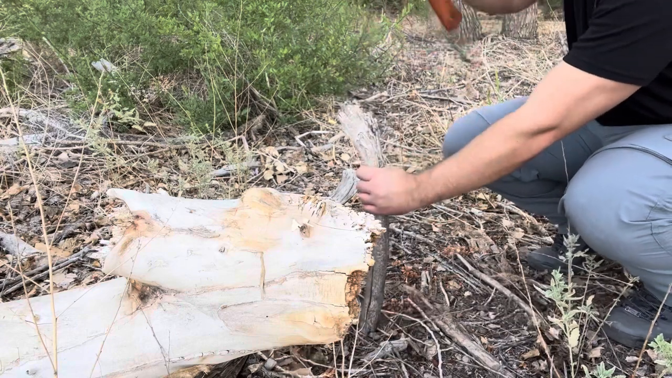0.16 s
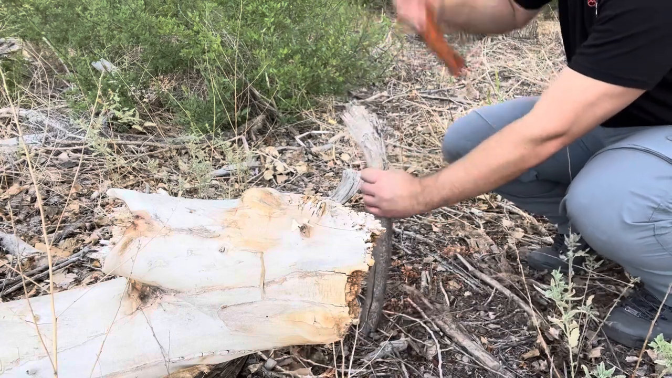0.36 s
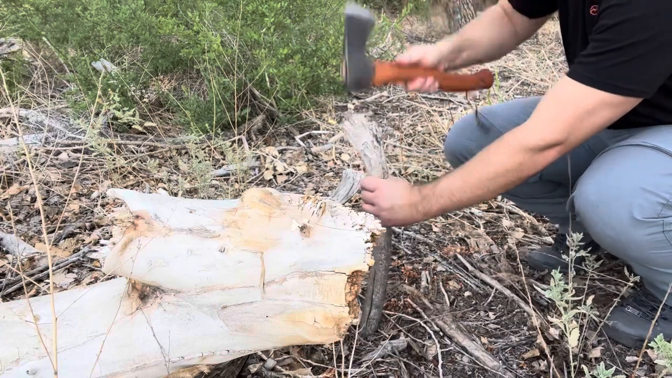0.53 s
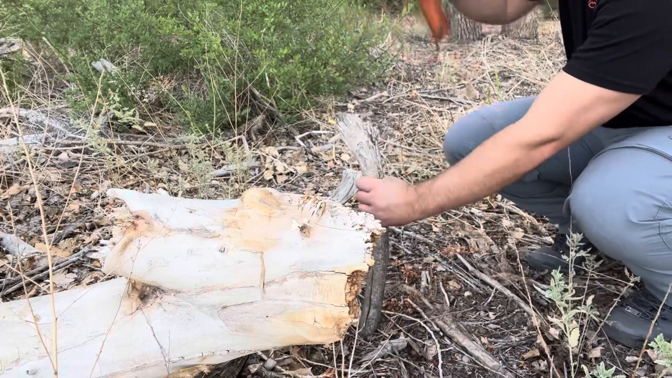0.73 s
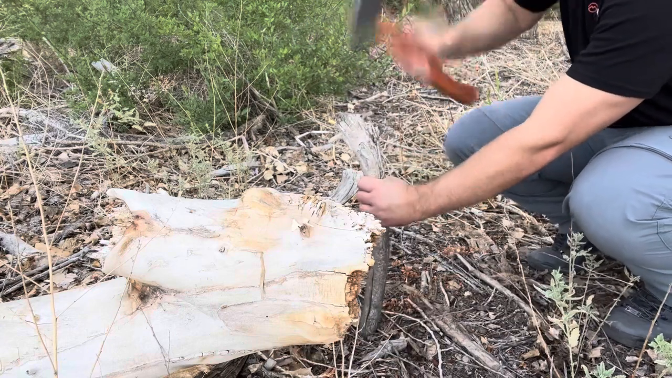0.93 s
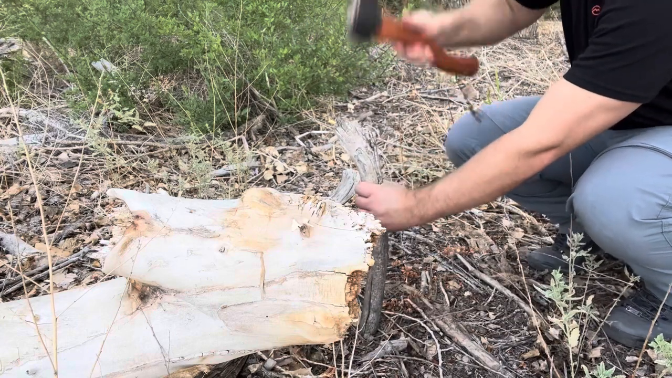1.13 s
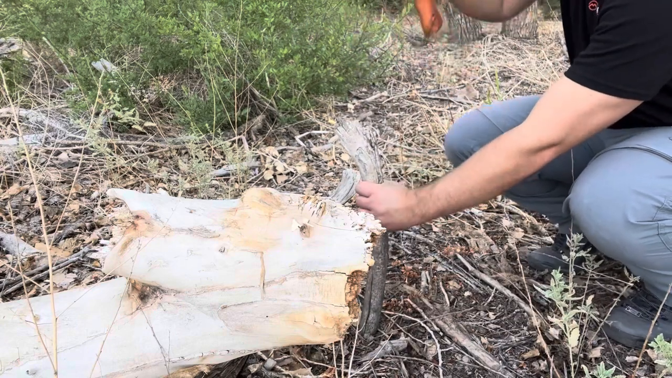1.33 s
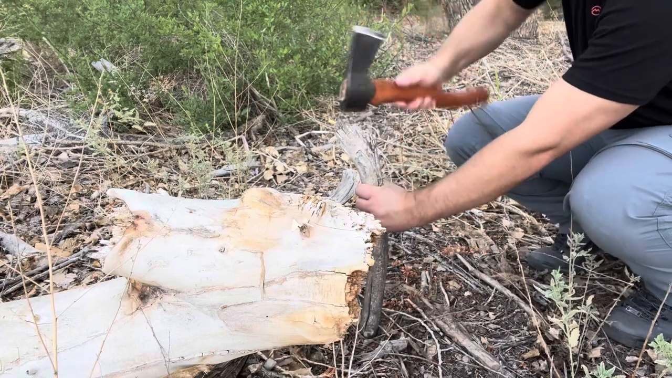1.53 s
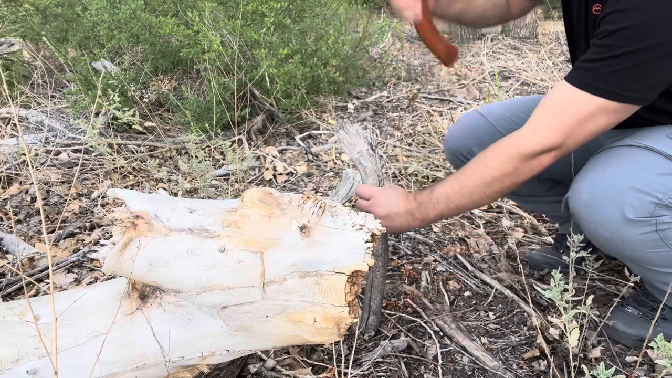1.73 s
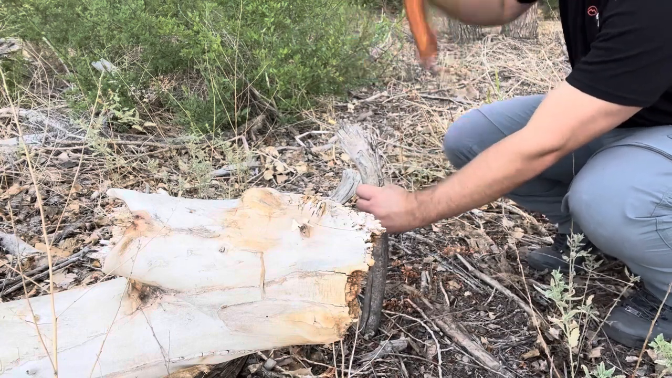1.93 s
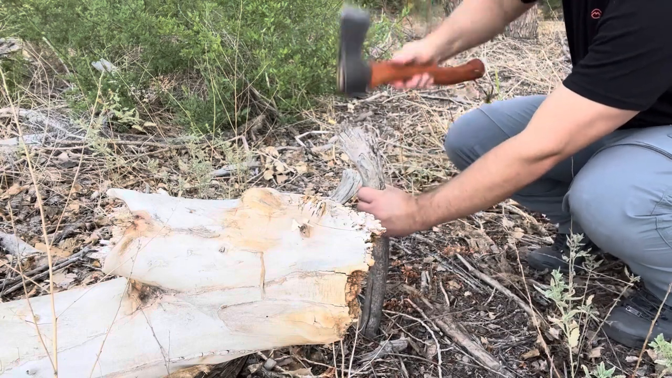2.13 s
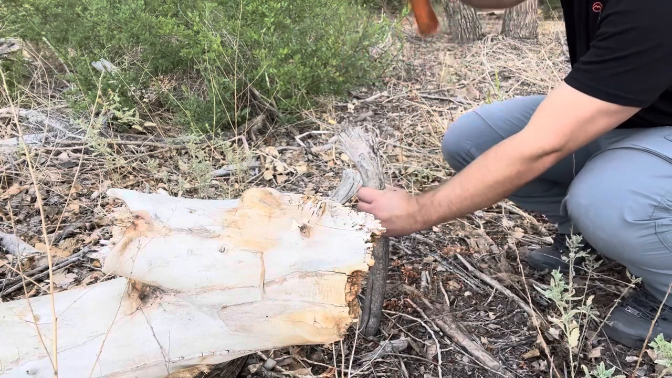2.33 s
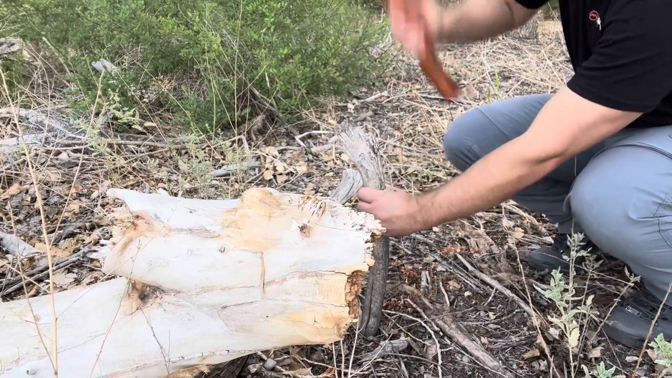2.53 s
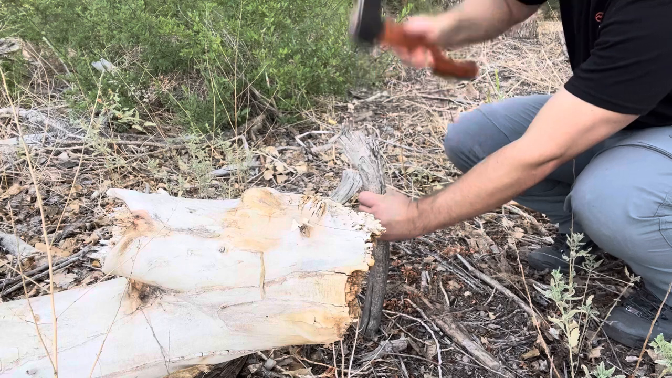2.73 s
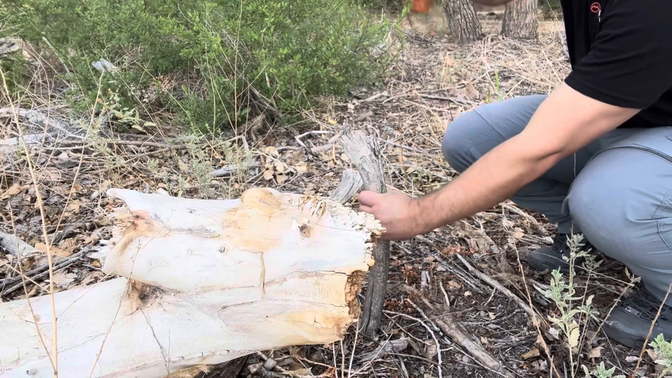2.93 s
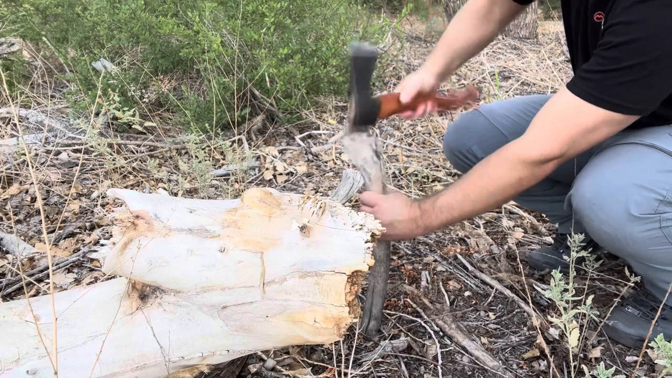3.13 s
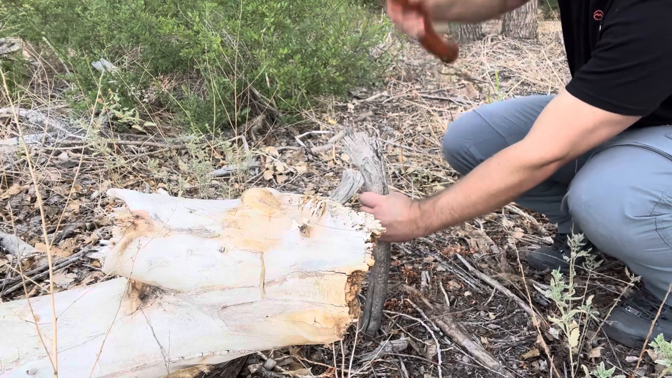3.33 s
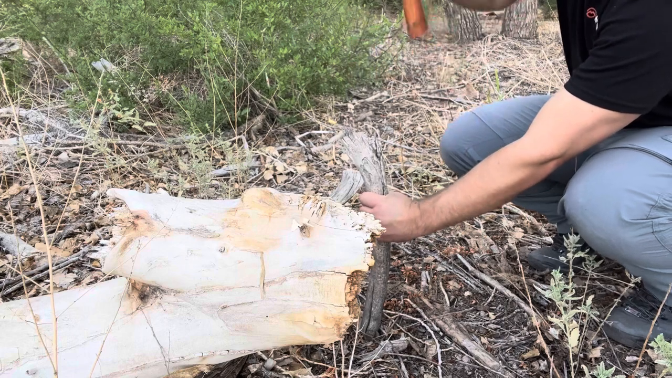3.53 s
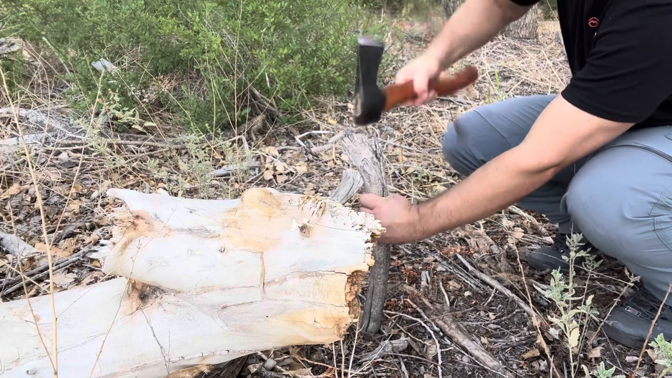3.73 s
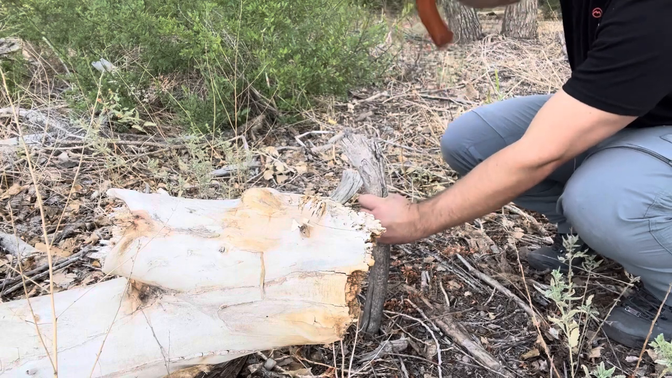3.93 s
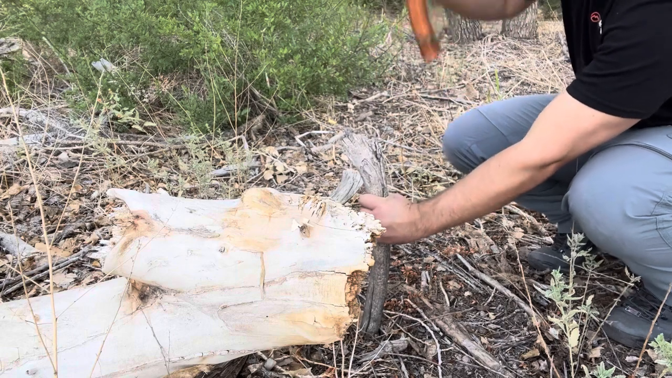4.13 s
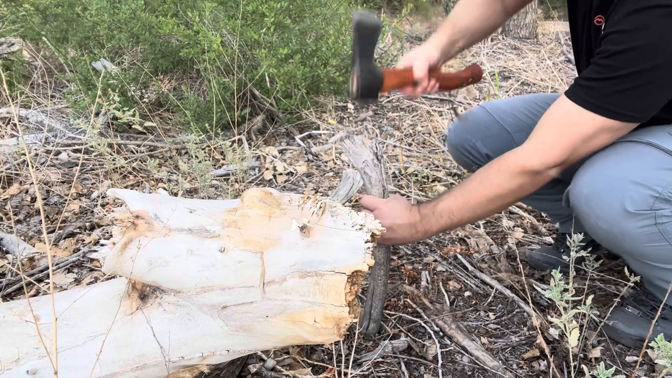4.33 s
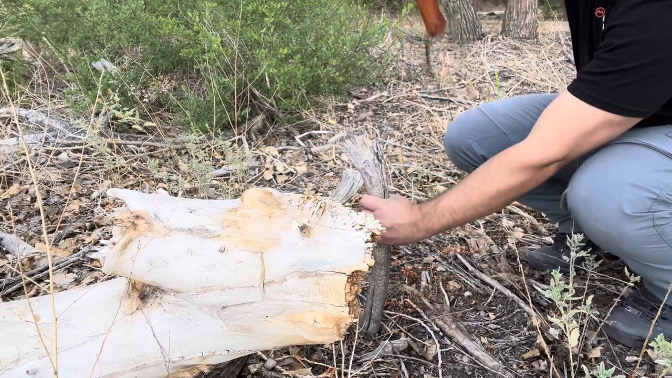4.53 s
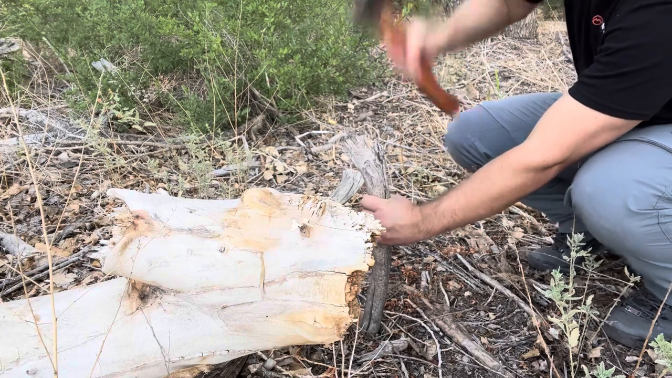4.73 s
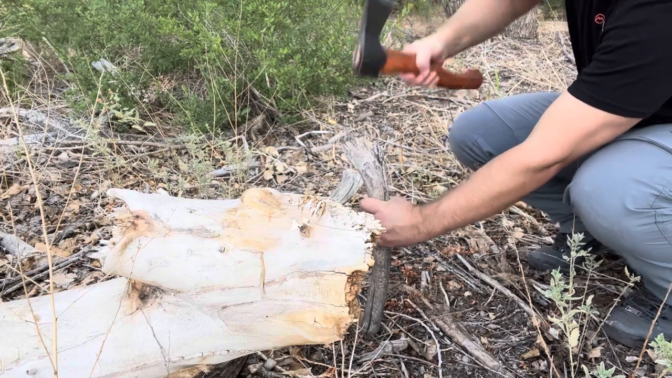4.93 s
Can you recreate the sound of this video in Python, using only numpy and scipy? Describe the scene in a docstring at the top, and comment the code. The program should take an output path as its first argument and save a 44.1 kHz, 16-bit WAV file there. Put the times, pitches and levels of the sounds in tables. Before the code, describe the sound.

A steel hatchet head knocks a dry wooden stake into the ground, nine sharp even blows echoing softly off brush outdoors.

```python
"""Open ground beside a log: a hatchet head drives a dry wooden stake in with nine even knocks, the seventh glancing.
Each blow is decaying noise for the cracking end grain, damped modes for stake and soil, and a short steel ring;
banded noise returns it from the litter, the log and the brush.
Dry litter crackles and snaps around each swing; a far bird calls in narrow-band notes.
Behind lie a thin hum that steps up once and a steady rumble with faint hiss."""
import sys
import numpy as np
from scipy import signal
from scipy.fft import rfft, irfft, next_fast_len
from scipy.io import wavfile
from scipy.ndimage import uniform_filter1d

SR = 44100
rng = np.random.default_rng(int(sys.argv[2]) if len(sys.argv) > 2 else 0)


def log_audio(samples):
    """Write samples as a 16-bit WAV file to the path given in sys.argv[1]."""
    # one column per channel
    frames = np.atleast_2d(samples).T
    # limit to full scale, then quantise
    limited = np.clip(frames, -1, 1)
    pcm = np.round(limited * 32767).astype(np.int16)
    wavfile.write(sys.argv[1], SR, pcm)


N = 223669

# hatchet blows: start_s, force_db, glance (0 square to 1 skidding), middle_modes_db, crack_tilt_db_per_octave,
# steel_ring_db, body_pitch_factor, high_modes_pitch_factor, swing_rustle_db
BLOWS = [(0.419, -2, .04, 2.5, 6, -56, 0.94, 0.91, -62), (0.9546, -3, .05, 2, 2, -21, 1, 1.003, -92),
         (1.4791, -2.5, 0.2, 2, -0.5, -37, .91, .9, -78.5),
         (2.0143, -2, 0.028, -2, 5, -32.5, 1.09, 1.05, -69), (2.572, 2, 0.5, 0, 2.5, -29, 1.04, 1.012, -75),
         (3.119, -1, .3, -4, 2, -60, 0.93, 0.84, -69.5),
         (3.6484, 0.5, 1, 1.5, 7.5, -49, 1.14, 1.005, -62.5),
         (4.2176, -2, 0.36, 2, 4, -44.5, .81, 0.94, -69), (4.7601, 0, 0.56, 2.5, 3, -46, 0.93, 1.05, -63)]
# hatchet head modes: pitch_hz, level_db, t60_s
STEEL = [(3768, 0, .075), (3850, -7, .06), (4077, -11, .06), (8549, -10, .09), (9092, -12, .075),
         (11050, -5, .035)]
SWING_LEAD_S, SWING_WIDTH_S = 0.14, 0.075  # rustle centre before each blow, Gaussian sigma


def amp(db):
    """Decibels to gain."""
    return 10 ** (np.asarray(db) / 20)


def evened(x):
    """Scales to rms 1."""
    return x / np.sqrt(np.mean(x ** 2) + 1e-20)


def decay(t, t60_s):
    """Exponential decay, down 60 dB after t60_s."""
    return np.exp(-np.log(1000) * t / t60_s)


def read(points, hz, axis=1):
    """One column of a table, interpolated over log frequency."""
    table = np.transpose(points)
    return np.interp(np.log(hz + 1), np.log(table[0] + 1), table[axis])


def add(mix, start_s, sound):
    """Mixes a stereo sound in at start_s, cut at the end of the mix."""
    part = mix[:, max(round(start_s * SR), 0):][:, :sound.shape[1]]
    part += sound[:, :part.shape[1]]


def diffuse(size):
    """Flat random-phase spectra of noise from all around, partly alike left and right."""
    # likeness of the two channels: freq_hz, likeness (-1 to 1)
    likeness = [(60, 0.98), (130, 0.91), (250, 0.82), (500, -0.12), (950, -0.35), (2000, 0.17),
                (15000, -0.18)]
    hz = np.fft.rfftfreq(size, 1 / SR)
    a, b = np.exp(2j * np.pi * rng.random((2, len(hz))))
    same = np.clip(read(likeness, hz), -1, 1)
    return hz, np.array([a, same * a + np.sqrt(1 - same ** 2) * b])


def burst(bands, size, tilt_db=0, hold_s=0):
    """Stereo noise puff; each band lingers for about hold_s, then decays at its own rate."""
    hz, spectra = diffuse(size)
    t = np.hypot(np.arange(size) / SR, hold_s) - hold_s
    out = np.zeros((2, size))
    log_centres = np.log([row[0] for row in bands])
    for share, (centre_hz, level_db, t60_s) in zip(np.eye(len(bands)), bands):
        weight = np.interp(np.log(hz + 1), log_centres, share)  # triangular, overlapping its neighbours
        band = evened(irfft(spectra * weight, size))
        gain = amp(level_db + tilt_db * np.log2(centre_hz / 4000))
        out += band * gain * decay(t, t60_s)
    return out


def from_stake(x, turn=1):
    """Places a mono sound at the stake by phase and level; a smaller turn shrinks the phase offset."""
    # stereo offsets: freq_hz, right_lead_rad, left_minus_right_db
    offsets = [(100, .2, -.7), (280, .7, -1.5), (600, .75, -5), (1100, .7, -.5), (2000, 1.4, -1),
               (3200, 2.4, -3), (5200, 3.5, -5), (6800, 3.9, -1.5), (9000, 2.2, -.5), (12000, 0, 0),
               (15000, -2.9, 0)]
    size = next_fast_len(len(x) + 512)
    hz = np.fft.rfftfreq(size, 1 / SR)
    half = amp(read(offsets, hz, axis=2) / 2) * np.exp(-0.5j * turn * read(offsets, hz))
    return irfft(rfft(x, size) * np.array([half, 1 / half]), size)[:, :len(x)]


def mode(t, hz, swell_s, steep=1):
    """A heavily damped vibration that peaks at swell_s and then dies."""
    u = np.maximum(t, 0) / swell_s
    return (u * np.exp(1 - u)) ** steep * np.sin(2 * np.pi * hz * t)


def blows(spread_db=-13, near_db=-33):
    """Crack, stake, soil and steel of every blow, then the scatter of the surroundings."""
    # square blow at force 0 dB: body_db, middle_modes_db, top_modes_db, crack_db, thud_db
    square_db = np.array((-12.5, -12, -17, -13.5, -11))
    # change at full glance, same columns: a skidding head barely drives the stake
    glance_change_db = np.array((-22, -9.5, 2, -12, -6.5))
    loose_db, seat_s, firm_db_per_s = -15.5, 0.33, 0.97  # thud weak until seated, then grows with depth
    echo_base_db, clack_base_db = -47, -37.5
    glance_echo_db = 1  # a skidding blow throws more sound into the brush
    steel_turn = 0.45  # the head rings above the stake, nearer the centre
    rock_lag_s, rock_db, rock_hz, rock_t60_s = 0.053, -45, 1050, 0.017  # stake rocks back with a dull tap

    out = np.zeros((2, N))
    t = np.arange(SR) / SR
    first_s = BLOWS[0][0]
    for start_s, force_db, glance, spot_db, tilt_db, ring_db, body_pitch, high_pitch, _ in BLOWS:
        levels_db = force_db + square_db + glance ** 2 * glance_change_db
        body_db, middle_db, top_db, crack_db, thud_db = levels_db
        thud_db -= force_db  # the thud does not follow the force
        thud_db += loose_db * np.exp(-(start_s - first_s) / seat_s) + firm_db_per_s * start_s
        echo_db = echo_base_db + force_db + glance_echo_db * glance
        clack_db = clack_base_db + force_db + 20 * np.log10(abs(glance) + 1e-6)

        wood = stake(t, [body_db, middle_db + spot_db, top_db], [body_pitch, high_pitch])
        soil = amp(thud_db) * thud(t)
        add(out, start_s, from_stake(wood + soil))
        add(out, start_s, from_stake(amp(ring_db) * steel(t), steel_turn))
        centre, width = amp(crack_db) * crack(tilt_db)
        add(out, start_s, from_stake(centre) + amp(spread_db) * np.array([width, -width]))
        add(out, start_s, amp(near_db + crack_db / 2) * near_scatter())
        add(out, start_s + rock_lag_s, snap(rock_db + force_db, rock_hz, rock_t60_s))
        add(out, start_s, brush(t, echo_db, clack_db))
        add(out, start_s, amp(ring_db) * ring_echo(t))
    return out


def stake(t, levels_db, pitches, lag_cycles=0.81, scatter=0.029, spot_scatter_db=3):
    """Bending waves run slower at low pitch, so low modes arrive later; each blow lands on another spot."""
    # bending modes at pitch factor 1: pitch_hz, level_db, swell_s
    bending_modes = [(275, -9, .0033), (505, 1, .0018), (930, 0.5, .0015), (1370, -1, .0012),
                     (1600, -3, .0012), (1860, -3, .0012), (2480, -0.5, .001), (3050, -3, .0011)]
    out = np.zeros(len(t))
    draws = rng.standard_normal((len(bending_modes), 2))
    for (hz, db, swell_s), (detune, spot) in zip(bending_modes, draws):
        high = np.clip(np.log2(hz / 550), 0, 1)  # only the higher modes vary at random
        group_db = np.interp(hz, [600, 1400, 1900, 2400], np.repeat(levels_db, [1, 2, 1]))
        level_db = db + group_db + spot_scatter_db * high * spot
        pitch = np.interp(hz, [600, 900], pitches) + scatter * high * detune
        out += amp(level_db) * mode(t - lag_cycles / hz, hz * pitch, swell_s)
    return out


def crack(tilt_db, crush_s=0.0005, bounce_s=0.0022, bounce_db=-7):
    """End-grain fibres give way in a few uneven snaps; the ground mirrors them a moment later."""
    # crushed end grain before tilt: centre_hz, level_db, t60_s
    grain_bands = [(740, -12.5, .016), (1620, -6, 0.057), (2700, -5.5, 0.04), (4800, -5, 0.015),
                   (5730, 4, 0.012), (7910, 1.5, 0.0061), (9550, -2.5, 0.012), (11850, -8.5, 0.011),
                   (16700, -14.5, .009)]
    t = np.arange(2048) / SR
    snaps = amp(3.5 * evened(uniform_filter1d(rng.standard_normal(len(t)), 14)))
    smooth = burst(grain_bands, size=len(t), tilt_db=tilt_db) * (1 - np.exp(-t / crush_s))
    uneven = smooth * snaps
    direct = uneven * np.std(smooth) / np.std(uneven)
    return direct + amp(bounce_db) * np.roll(direct, round(bounce_s * SR), axis=1)


def thud(t, rebound_s=0.0175, rebound_db=-12, steep=3.7, lag_cycles=0.86):
    """The soil takes up the blow a moment later, and once more as the stake springs back."""
    # soil and the log resting on it: pitch_hz, level_db, swell_s
    ground_modes = [(70.5, -13, 0.017), (119.2, -5, 0.011), (191, -13, 0.0094)]

    def jolt(u):
        """Sums the ground modes, low ones later."""
        return sum(amp(db) * mode(u - lag_cycles / hz, hz, swell_s, steep) for hz, db, swell_s in ground_modes)

    return jolt(t) + amp(rebound_db) * jolt(t - rebound_s)


def steel(t):
    """The hatchet head rings briefly as decaying sine modes."""
    return sum(amp(db) * decay(t, t60_s) * np.sin(2 * np.pi * hz * t) for hz, db, t60_s in STEEL)


def near_scatter():
    """Litter and log close by scatter the blow as short banded noise."""
    # close scatter: centre_hz, level_db, t60_s
    near_bands = [(300, 15, 0.13), (870, 6.5, 0.081), (2000, 12.5, 0.075), (3640, 15, 0.083),
                  (7640, 9, 0.038), (11000, 0, 0.16), (15600, -28, .08)]
    return burst(near_bands, size=8192)


def far_note(t, centre_hz, width_hz, rise_s, t60_s):
    """A narrow band of sound smeared by many paths through the trees."""
    hz, spectra = diffuse(size=len(t))
    resonance = 1 / (1 + ((hz - centre_hz) / width_hz) ** 2)
    note = evened(irfft(spectra * resonance, len(t)))
    return note * (1 - np.exp(-t / rise_s)) * decay(t, t60_s)


def brush(t, echo_db, clack_db, clump_db=1.2):
    """Bushes and trunks at many distances return the blow in clumps, the stake's clack standing out."""
    # echo from bushes and trees: centre_hz, level_db, t60_s
    far_bands = [(400, -10, 0.93), (1167, -18.5, 0.8), (1670, -13, 0.63), (2640, -7, 0.45),
                 (4700, -11, 0.51), (6400, -11.5, 0.36), (7407, -34, 0.04), (11300, -14.5, 0.29),
                 (15000, -54, .3)]
    clumps = amp(clump_db * evened(uniform_filter1d(rng.standard_normal(len(t)), size=900)))
    wide = amp(echo_db) * burst(far_bands, size=len(t), hold_s=0.19) * (1 - np.exp(-t / 0.0036))
    clack = amp(clack_db) * far_note(t, centre_hz=2850, width_hz=300, rise_s=0.14, t60_s=0.65)
    return clumps * (wide + clack)


def ring_echo(t):
    """The trees return the steel's lowest note as a blurred shimmer."""
    return amp(-24) * far_note(t, STEEL[0][0], width_hz=400, rise_s=0.03, t60_s=0.6)


def opening_echo(ago_s=0.23, echo_db=-42, clack_db=-52):
    """The echo of a previous blow is still dying away as the scene opens."""
    out = np.zeros((2, N))
    echo = brush(np.arange(SR) / SR, echo_db, clack_db)
    add(out, 0, echo[:, round(ago_s * SR):])
    return out


def snap(level_db, centre_hz, t60_s, octaves=1.0, rise_s=0.000046):
    """A short dry break or tap: a noise band with a sharp rise and exponential decay."""
    hz, spectra = diffuse(size=2048)
    band = np.exp(-0.5 * (np.log2((hz + 1) / centre_hz) / octaves) ** 2)
    treble_cut = 1 / (1 + (hz / 14000) ** 10)
    noise = evened(irfft(spectra * band * treble_cut))
    t = np.arange(noise.shape[1]) / SR
    shape = decay(t, t60_s) * (1 - np.exp(-t / rise_s))
    return amp(level_db) * noise * shape / shape.max()


def twigs(count=3, scatter_octaves=0.52):
    """Louder snaps of twigs and bark chips, and a few small ones scattered over every swing."""
    # louder snaps: start_s, level_db, centre_hz, t60_s
    loud_snaps = [(0.2865, -45, 6300, 0.04), (0.311, -49, 5740, .054), (0.463, -31, 5460, 0.0082),
                  (0.7828, -41.5, 8860, 0.0079), (0.9895, -28.5, 10740, 0.019), (1.3354, -38, 6500, 0.017),
                  (1.3683, -43.5, 6040, 0.012), (1.3956, -47, 11500, 0.0069), (1.837, -40.5, 8700, .012),
                  (1.8627, -36.5, 10800, 0.011), (1.921, -45, 9900, 0.0058), (1.975, -43.5, 6540, 0.018),
                  (2.22, -44, 3700, 0.018), (2.418, -46, 1970, .023), (2.4805, -40.5, 6800, 0.0095),
                  (3.477, -39, 7900, 0.01), (3.572, -40.5, 2940, 0.022), (3.9917, -42.5, 11000, 0.0075),
                  (4.0256, -43, 5000, 0.014), (4.5423, -41, 5570, .011), (4.575, -40, 3330, 0.051),
                  (4.8205, -21.5, 5560, 0.0053)]
    small_db, spread_db, small_hz, small_t60_s = -52, 3, 10100, 0.0076
    out = np.zeros((2, N))
    for start_s, level_db, centre_hz, t60_s in loud_snaps:
        add(out, start_s, snap(level_db, centre_hz, t60_s))
    for blow_s, *_ in BLOWS:
        for when, strength, colour in rng.standard_normal((count, 3)):
            centre_hz = small_hz * 2 ** (scatter_octaves * colour)
            small = snap(small_db + spread_db * strength, centre_hz, small_t60_s)
            add(out, blow_s - SWING_LEAD_S + SWING_WIDTH_S * when, small)
    return out


def litter(grains_per_s=110, rest_db=-69, settle_db=-47.5, settle_t60_s=0.52):
    """A fine crackle of sleeve and leaves swells with each swing and settles at the opening."""
    t = np.arange(N) / SR
    swings = sum(amp(rustle_db) * np.exp(-0.5 * ((t - blow_s + SWING_LEAD_S) / SWING_WIDTH_S) ** 2)
                 for blow_s, *_, rustle_db in BLOWS)
    settling = amp(settle_db) * decay(t, settle_t60_s)
    hz, spectra = diffuse(size=N)
    strengths = amp(3 * np.minimum(rng.exponential(1, N), 3))
    grains = (rng.random(N) < grains_per_s / SR) * strengths
    grit = evened(signal.lfilter([1], [1, -np.exp(-1 / (0.005 * SR))], grains))  # 5 ms decay
    # freq_hz, relative level_db
    colour = amp(read([(800, -32.0), (2200, -17), (4000, 3), (6000, 0.0), (8000, -11), (11000, 5.5),
                       (13500, -5.0), (15500, -33.0)], hz))
    crackle = evened(irfft(spectra * colour, N) * (0.45 + grit))
    return crackle * (amp(rest_db) + swings + settling)


def bird(width_hz=160):
    """Short far notes, each a narrow noise band cut at half a second."""
    # notes: start_s, pitch_hz, level_db, t60_s
    notes = [(0.633, 4850, -47, 0.46), (0.723, 2760, -55, 0.3), (4.666, 4100, -62, 1)]
    out = np.zeros((2, N))
    t = np.arange(SR // 2) / SR
    for start_s, pitch_hz, level_db, t60_s in notes:
        add(out, start_s, amp(level_db) * far_note(t, pitch_hz, width_hz, 0.02, t60_s))
    return out


def hum(pitch_hz=329, waver=0.006, start_db=-74, step_db=9.5, step_at_s=3.9, step_rise_s=0.051):
    """A thin, slightly wavering far sine tone that steps up once in level."""
    t = np.arange(N) / SR
    drift = evened(uniform_filter1d(rng.standard_normal(N), size=6000))
    level_db = start_db + step_db * 0.5 * (1 + np.tanh((t - step_at_s) / step_rise_s))
    phase = 2 * np.pi * np.cumsum(pitch_hz * (1 + waver * drift)) / SR
    return amp(level_db) * np.sqrt(2) * np.sin(phase)


def air(level_db=-48, low_cut_hz=28):
    """Steady low outdoor rumble and faint hiss, as shaped noise."""
    # noise spectrum: freq_hz, relative_level_db (per Hz)
    spectrum = [(15, -26.5), (25, -19.5), (64, 3), (109, 3.5), (186, -10.5), (257, -12.5), (354, -16),
                (856, -16.5), (1460, -34), (4150, -41), (4870, -43), (8320, -56.5), (11200, -54),
                (13500, -55.5), (15000, -54)]
    hz, spectra = diffuse(size=N)
    colour = amp(read(spectrum, hz)) * hz ** 2 / np.hypot(hz ** 2, low_cut_hz ** 2)
    return amp(level_db) * evened(irfft(spectra * colour, N))


def scene():
    """Sums the blows and their echoes, litter, bird, hum and air."""
    return opening_echo() + blows() + twigs() + litter() + bird() + hum() + air()


def record(dry, ceiling=0.88, edge_hz=15800):
    """Rounds off the loudest peaks, then limits the band."""
    rounded = dry / (1 + (dry / ceiling) ** 6) ** (1 / 6)
    lowpass = signal.firwin(255, edge_hz, window=("kaiser", 9), fs=SR)
    return signal.oaconvolve(rounded, lowpass[None], "same")


dry = scene()
out = record(dry)
log_audio(out)
```